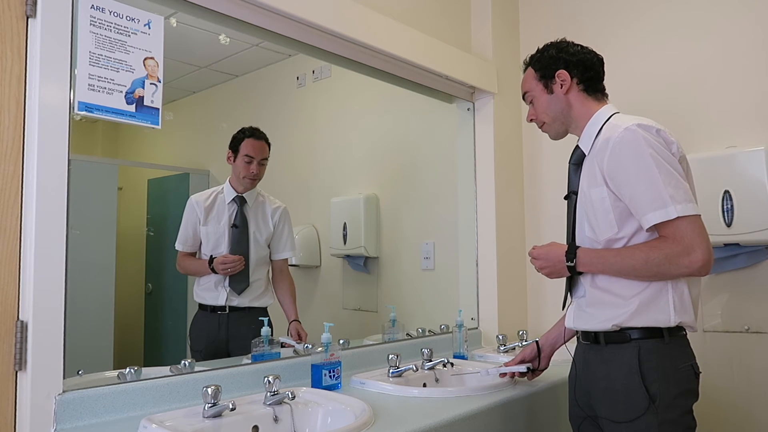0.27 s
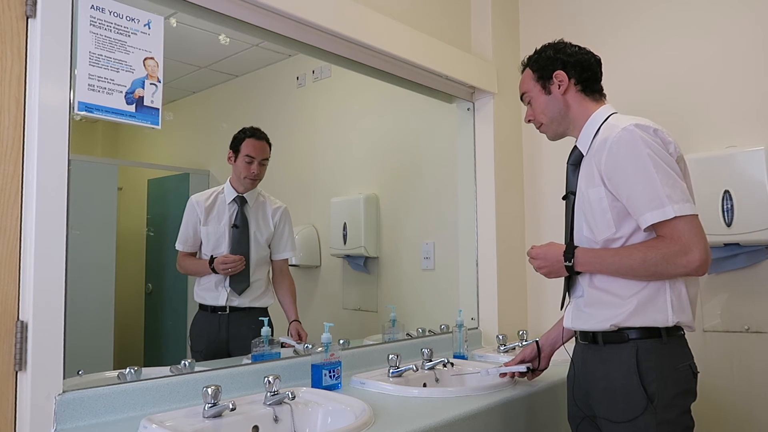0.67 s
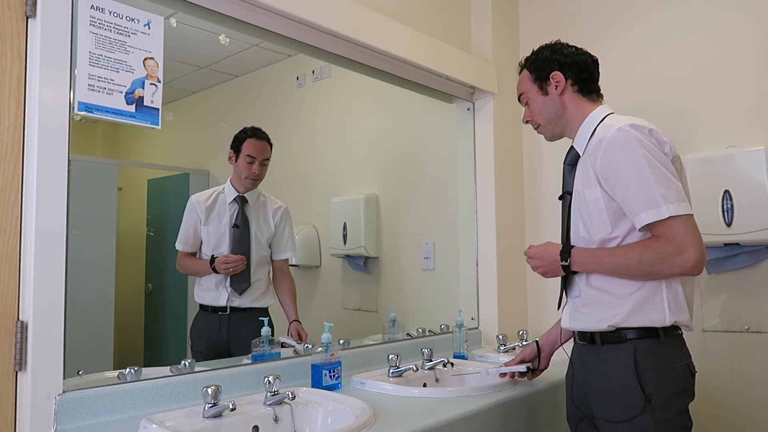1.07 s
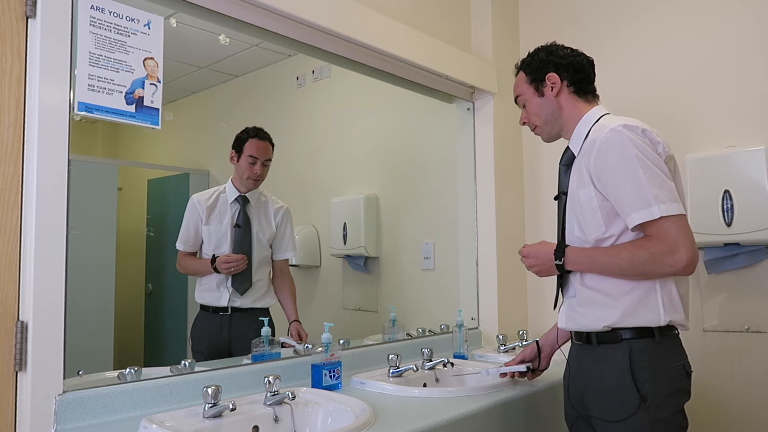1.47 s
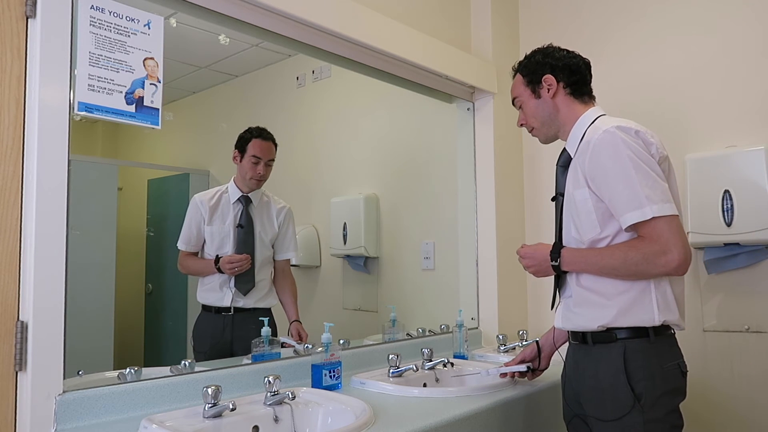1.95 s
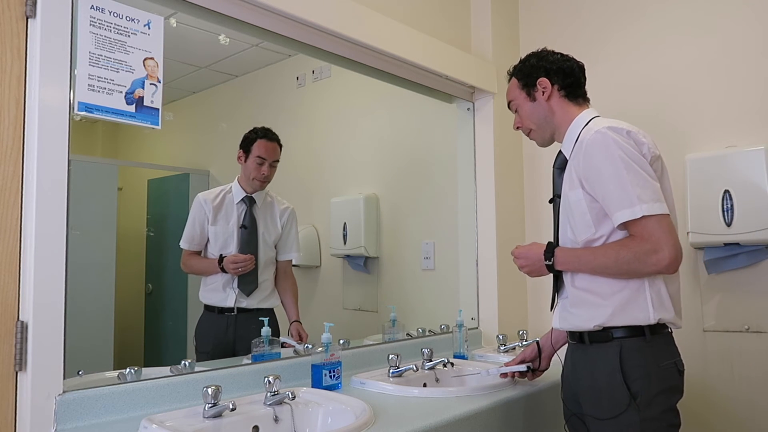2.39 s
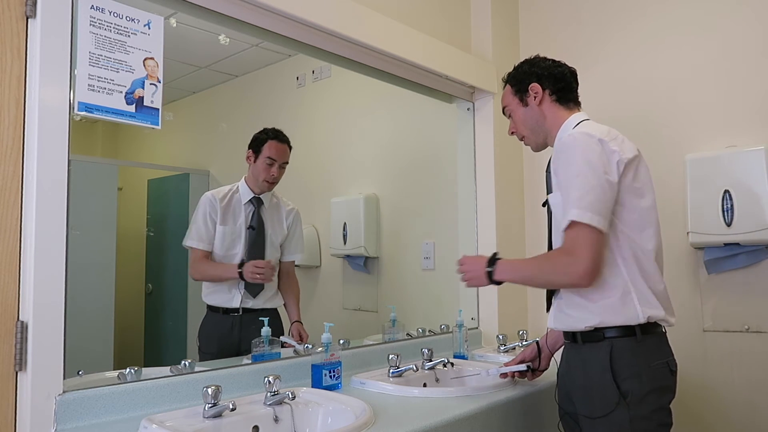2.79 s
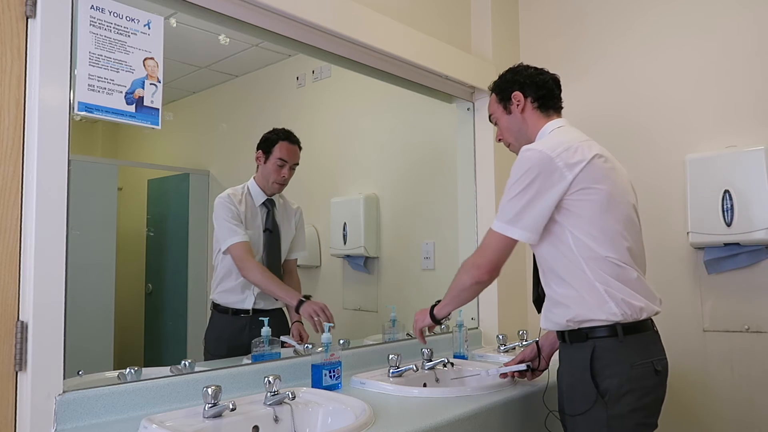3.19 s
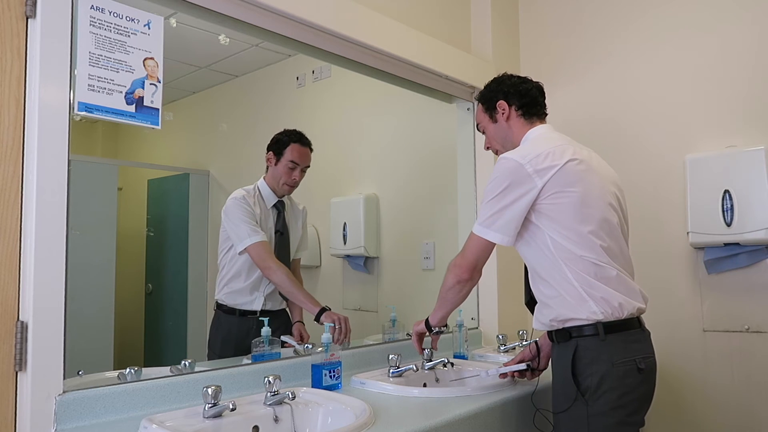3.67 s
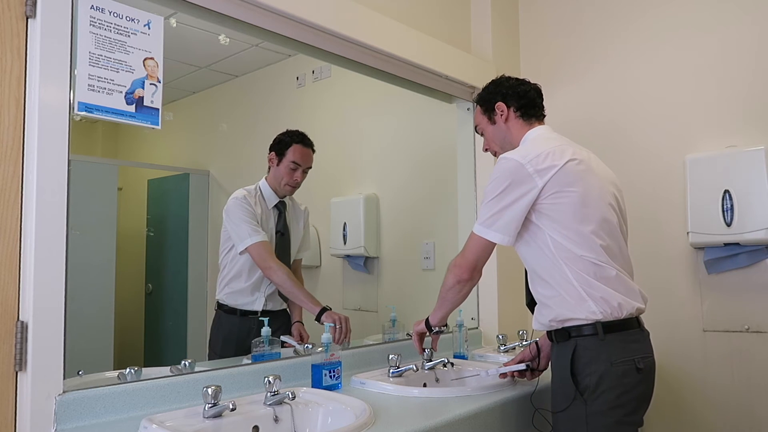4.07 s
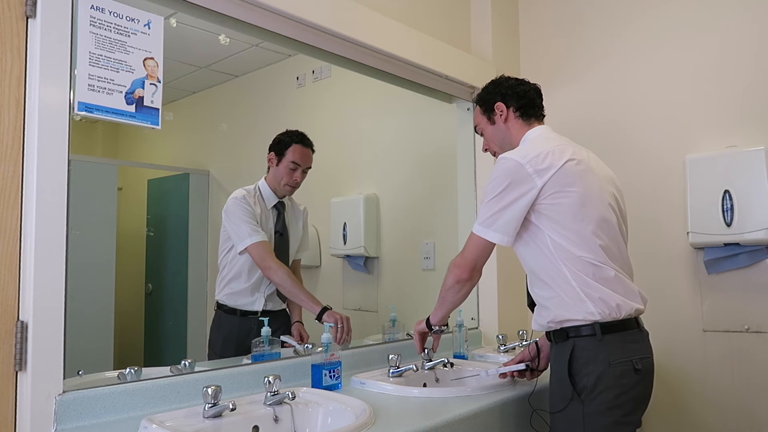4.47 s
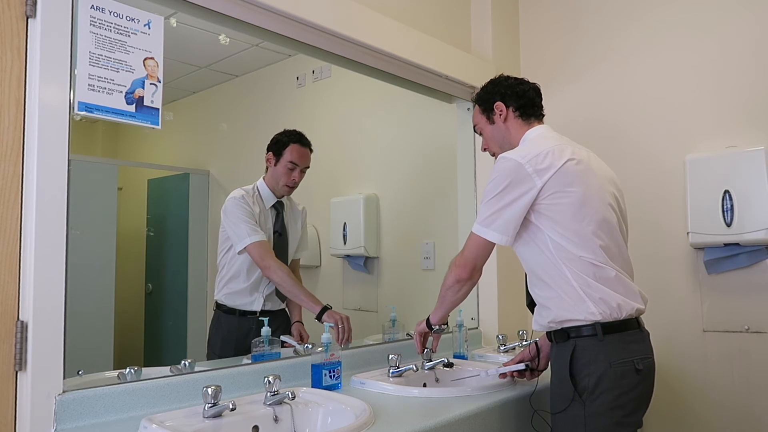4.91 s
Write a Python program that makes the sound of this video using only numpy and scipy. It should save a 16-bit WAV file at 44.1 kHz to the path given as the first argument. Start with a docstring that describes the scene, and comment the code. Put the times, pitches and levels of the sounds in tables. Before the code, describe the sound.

From the start a thin stream of tap water splashes into a washbasin, close to the microphone: a bright, grainy hiss full of tiny high pops, with softer hollow gurgles and plops from the drain. Low pipe rumble, ventilation and faint microphone hiss lie underneath. At about 0.5 s a soft, dull knock, like a panel being bumped, sounds in the room. From 0.8 to 2.3 s the water is at its fullest, uneven and sparkling. It dips near 2.8 s, recovers around 3.2 s, drops again near 3.7 s and surges briefly at 4.1 s. It then falls away quickly, and by about 4.6 s the tap is closed. Single drops remain, one at 4.8 s with a tiny upward blip, then a few faint ticks until just after 5 s, while the low rumble rises slightly. Short tiled-room reflections surround the water. No speech is heard.

```python
"""Tiled washroom: from the start a thin tap stream breaks up in a basin, spray bubbles (damped sines)
popping in the treble, bigger ones plopping in the drain, over noise for pipes, ventilation and microphone hiss.
Half a second in, a dull knock (decaying modes and a puff of noise) sounds somewhere in the room.
The tap closes near the end; the last drops fall singly, one with a swelling upward sweep.
Early echoes and a noise tail place bubbles, drip and knock among the walls."""
import sys
import numpy as np
from scipy import signal
from scipy.fft import rfft, irfft, next_fast_len
from scipy.io import wavfile
from scipy.ndimage import uniform_filter1d, map_coordinates

SR = 44100
rng = np.random.default_rng(int(sys.argv[2]) if len(sys.argv) > 2 else 0)


def bounce(signal):
    """Save signal as a 16-bit WAV file at the path given by the first command-line argument."""
    frames = np.transpose(np.atleast_2d(signal))
    limited = np.clip(frames, -1, 1)
    pcm = np.round(limited * 32767).astype(np.int16)
    wavfile.write(sys.argv[1], SR, pcm)


N = 226672

# Levels of splash, gurgle and low rumble before layer trims; recording gain probably lifts the rumble
# after the tap shuts: [t/s, splash level/dB, gurgle level/dB, low rumble level/dB]
LEVELS = [(0.0, -31, -44, -43), (0.3, -31.5, -44, -42.5), (0.55, -32.5, -44, -40), (0.8, -28.5, -43, -41),
          (1.18, -28.5, -42, -37.5), (1.4, -29.5, -44, -39), (1.65, -29.5, -42, -40),
          (2.25, -30.5, -43, -40.5), (2.83, -35, -45.5, -46), (3.18, -30.5, -42, -40),
          (3.45, -34.5, -47.5, -44.5), (3.74, -38.5, -52.5, -51), (4.11, -30, -44, -44.5),
          (4.27, -36.5, -47.5, -45.5), (4.52, -45.5, -55, -53.5), (4.78, -46, -61, -47.5),
          (4.94, -46.5, -51.5, -43.5), (5.14, -47.5, -47.5, -42)]
# Loudest small bubbles, before the room: [t/s, peak level/dB, f/Hz]
POPS = [(0.037, -9.5, 7280), (0.0562, -17, 8270), (0.0943, -22, 6300), (0.1665, -18.5, 4260),
        (0.185, -13.5, 7200), (0.209, -17, 6700), (0.215, -21.5, 5000), (0.2876, -13.5, 7700),
        (0.2965, -22, 6700), (0.3383, -8, 8900), (0.454, -26, 10470), (0.4846, -19.5, 10200),
        (0.5935, -13, 13900), (0.594, -16, 7700), (0.6473, -8, 6550), (0.699, -18, 5300),
        (0.752, -19, 6950), (0.7725, -20, 8200), (0.784, -21, 4300), (0.7942, -18, 8750),
        (0.812, -14.5, 4740), (0.8124, -13.5, 9500), (0.8335, -16, 7500), (0.9161, -21, 6700),
        (0.949, -15.5, 4700), (0.9799, -12.5, 4700), (1.0026, -13, 9150), (1.0214, -15, 9690),
        (1.0613, -15, 8340), (1.0905, -19, 4100), (1.136, -9.5, 14000), (1.163, -12.5, 10000),
        (1.1962, -11.5, 8600), (1.1985, -18, 5830), (1.2063, -19, 5700), (1.2218, -14, 9300),
        (1.2286, -15, 8640), (1.2768, -14, 8370), (1.28, -11, 8600), (1.2846, -11.5, 6660),
        (1.3071, -8.5, 7860), (1.372, -9, 11540), (1.4262, -20, 4670), (1.4746, -15, 7700),
        (1.5314, -15, 9800), (1.537, -16, 7620), (1.597, -21, 5810), (1.6262, -19.5, 4630),
        (1.638, -8.5, 8900), (1.6457, -18, 6700), (1.696, -18, 7710), (1.7008, -23, 6720),
        (1.744, -18.5, 4870), (1.787, -11, 13100), (1.7875, -12.5, 7160), (1.8334, -16, 6060),
        (1.85, -16, 7440), (1.8614, -24, 6680), (1.89, -11.5, 4440), (1.9303, -26, 9400),
        (1.999, -11, 5470), (2.0608, -8, 5680), (2.0923, -20, 5600), (2.1053, -20, 12190),
        (2.1122, -17, 5100), (2.118, -20, 4180), (2.1335, -19, 4100), (2.1688, -12, 7000),
        (2.2418, -13.5, 5500), (2.2749, -9.5, 7640), (2.3233, -15.5, 8100), (2.367, -20, 5230),
        (2.386, -16, 6900), (2.4016, -18, 14560), (2.4365, -20, 13500), (2.4685, -16, 8570),
        (2.5342, -18, 5470), (2.5475, -8.5, 6400), (2.5538, -12, 6600), (2.573, -15, 5600),
        (2.5777, -12.5, 9100), (2.5885, -14, 10000), (2.592, -17, 6870), (2.6195, -18.5, 12600),
        (2.725, -25, 3700), (2.7451, -23.5, 7540), (2.765, -17, 10100), (2.8208, -22, 7450),
        (2.853, -8, 4210), (2.885, -27, 4870), (2.9866, -27, 11150), (2.9964, -13.5, 6030),
        (3.0547, -19.5, 4320), (3.0612, -16, 5900), (3.0646, -15.5, 7360), (3.128, -16.5, 6100),
        (3.1612, -21, 11240), (3.1671, -23, 4720), (3.183, -20.5, 4320), (3.1932, -16, 7200),
        (3.1962, -15, 5000), (3.2191, -21, 9800), (3.2314, -25, 7000), (3.237, -12.5, 10900),
        (3.285, -20.5, 4730), (3.329, -18, 8550), (3.441, -19, 10100), (3.4599, -19, 12660),
        (3.481, -12, 7940), (3.4996, -16, 5300), (3.544, -19, 5100), (3.5661, -17, 9500),
        (3.5812, -16, 9600), (3.6575, -22, 4680), (3.7153, -27.5, 3840), (3.738, -6.5, 7770),
        (3.7461, -24, 7900), (3.7589, -20, 5000), (3.8575, -23, 5860), (3.87, -17.5, 7460),
        (3.9229, -9, 5420), (3.9495, -18, 7300), (3.9754, -23.5, 5360), (4.0728, -21.5, 5240),
        (4.136, -19.5, 3900), (4.1372, -16, 6330), (4.2452, -15.5, 9800), (4.2664, -25, 5900),
        (4.279, -23, 5600), (4.3015, -18, 9200), (4.3475, -20, 11710), (4.3512, -24, 9100),
        (4.3728, -25, 5640), (4.3818, -22, 5800), (4.406, -18.5, 8850), (4.4188, -22, 9220),
        (4.4458, -17, 9450), (4.5004, -25.5, 6140), (4.512, -27, 10200), (4.519, -7.5, 7880),
        (4.544, -25, 7860), (4.5547, -24, 7500), (4.5806, -22, 7950), (4.6493, -19.5, 7800),
        (4.6551, -22, 10100), (4.663, -37, 4200), (4.702, -22, 12800), (4.75, -33, 5030),
        (4.781, -29, 8000), (4.854, -32, 10300), (4.923, -38, 5300), (4.96, -41, 7000), (4.985, -38, 5040),
        (5.0857, -34, 6600)]
# Larger bubbles in the drain, before the room: [t/s, peak level/dB, f/Hz, climb in pitch as a share of f]
PLOPS = [(0.0917, -28.5, 3030, .2), (.096, -30, 1750, .2), (0.1651, -26, 3260, .3),
         (0.254, -27.5, 2350, .2), (0.298, -29, 2090, .2), (0.6678, -30, 1730, 0.25),
         (0.693, -31.5, 1650, 0.11), (0.713, -36, 1700, 0.18), (0.725, -29, 2980, .2),
         (1.0034, -30.5, 1205, .2), (1.0869, -16.5, 2910, 0.26), (1.105, -27.5, 1220, .1),
         (1.596, -24, 2680, 0.22), (1.703, -31, 2790, 0.18), (1.8442, -29, 2200, 0.22),
         (1.9081, -31, 1900, 0.16), (1.945, -33, 1426, 0.12), (2.459, -26, 1120, 0.26),
         (2.6691, -23.5, 2550, .15), (2.7247, -37, 2700, .2), (2.7751, -34, 3020, 0.18),
         (2.865, -31.5, 2200, .05), (3.0582, -22.5, 3120, .2), (3.0815, -25, 1420, 0.12),
         (3.098, -27, 1555, 0.21), (3.133, -34, 1400, .2), (3.175, -25.5, 2700, .15),
         (3.1822, -23, 2790, .4), (3.228, -24, 2900, 0.22), (3.245, -28, 3200, .1),
         (3.3042, -29, 1860, .05), (3.5263, -38, 2680, .2), (3.5983, -35.5, 2440, 0.17),
         (3.6696, -34.5, 2760, .2), (3.714, -34, 2240, .4), (3.767, -31.5, 1960, 0.22),
         (3.772, -35, 1760, .05), (3.8836, -20.5, 2280, 0.14), (3.952, -30, 1740, .05),
         (4.11, -33.5, 1500, 0.091), (4.133, -32, 1540, .2), (4.148, -30, 2520, .2),
         (4.2157, -32.5, 1890, 0.26), (4.2635, -35.5, 1590, .05), (4.298, -31, 3150, .2),
         (4.337, -29.5, 1120, 0.44), (4.402, -32.5, 2200, 0.044), (4.4647, -35, 2780, .05),
         (4.544, -43, 2200, 0.22), (4.59, -41.5, 2760, .1), (4.7408, -38, 2090, 0.11),
         (4.746, -34, 2900, 0.26), (4.986, -46, 2780, .1), (5.069, -40, 2550, .2)]
# Modes of the knocked panel, relative to KNOCK_DB: [f/Hz, level/dB, t60/s]
KNOCK_MODES = [(503, -10, 0.19), (731, -2, 0.11), (1020, 1.5, 0.087), (1510, -8, 0.17), (1910, 1, 0.058),
               (2240, -3, .05)]
# Spectra in dB; rush() brings its noises to rms 1, SLAP filters the puffs directly.
# Dull body of the panel: [f/Hz, level/dB]
PANEL_BODY = [(250, -30), (450, 2), (1000, -7), (2000, -8), (4000, -42)]
# Hiss of the splash: [f/Hz, level/dB]
SPLASH = [(1470, -41), (2500, -6.5), (3520, 1), (4760, 1), (7530, -2), (14900, -6), (16000, -29)]
# Froth under the gurgle: [f/Hz, level/dB]
FROTH = [(500, -48), (900, -2), (1500, -4), (2200, 3), (3200, -3.5), (6000, -42)]
# Water striking water: [f/Hz, level/dB]
SLAP = [(1200, -60), (3000, -9.5), (6000, 3), (10000, 1.5), (16000, -4)]
# Low rumble of the pipes: [f/Hz, level/dB]
PIPES = [(100, -49), (170, -9.5), (279, 2), (345, -3.5), (382, -3.5), (620, -7), (748, -7.5), (864, -9.5),
         (949, -10.5), (1300, -12.5), (1690, -22.5), (2860, -120)]
# The bowl's hollow note: [f/Hz, level/dB]
BASIN = [(200, -33), (262, -18), (279, 1), (298, 13), (380, -46)]
# The waste pipe's steady note: [f/Hz, level/dB]
DRAIN = [(330, -55), (405, -1.5), (440, 2.5), (475, -0.5), (580, -58)]
# Ventilation: [f/Hz, level/dB]
FAN = [(15, -70), (28, -45), (54, -30), (78, -9.5), (118, 5.5), (170, -4.5), (260, -7), (1500, -20),
       (4000, -20.5), (8000, -45), (16000, -50)]
# Faint steady hiss of the microphone: [f/Hz, level/dB]
MIC_HISS = [(300, -60), (1100, -4), (1550, 3), (2100, -4), (4000, -4), (8000, -10), (16000, -14)]
# Early echoes off the nearest walls: [delay t/s, level/dB]
WALLS = [(.0012, -36), (.0045, -16.5), (.0078, -23.5), (0.014, -32)]
# Decay of the tiled room: [f/Hz, t60/s]
TILES = [(300, 0.41), (2000, 0.38), (6000, 0.27), (14000, 0.41)]

TOP_HZ = 15900
MIC_HISS_DB, DRAIN_DB = -60.5, -53.5
FAN_DB, FAN_SHARE = -40.5, 0.39  # dB before the share of the rumble level; dB per dB of rumble
KNOCK_S, KNOCK_DB = 0.506, -30
DRIP_S = 4.7732
SHUT_S, SHUT_FADE_S, SHUT_DULL_DB = 4.63, 0.25, -13  # the closing tap takes the finest bubbles away
SISTER_DB, SISTER_GROWS = -13.5, 0.68  # for a 0 dB pop; dB per dB of pop: the loudest ring cleanest
SLAP_DB, SLAP_GROWS, SLAP_SCATTER_DB = -15, 0.5, 4  # likewise for the drop's slap, before its spectrum
PLOP_CYCLES = 21.3


def amp(db):
    """Amplitude factor of a level in dB."""
    return 10 ** (np.asarray(db) / 20)


def unit(x):
    """Signal scaled to rms 1."""
    return x / np.sqrt(np.mean(x ** 2) + 1e-20)


def along(points, hz):
    """Value of (f/Hz, value) points, interpolated on a log frequency axis."""
    f, value = np.transpose(points)
    return np.interp(np.log(hz + 1), np.log(f + 1), value)


def curves(rows):
    """One value per sample for each column after the time."""
    s, *columns = np.transpose(rows)
    return [np.interp(np.arange(N) / SR, s, column) for column in columns]


def filtered(x, response):
    """Signal multiplied in the spectrum by a response of frequency."""
    size = next_fast_len(N + SR // 2)
    spectrum = rfft(x, size) * response(np.fft.rfftfreq(size, 1 / SR))
    return irfft(spectrum, size)[:N]


def rush(spectrum, patchy_db):
    """Shaped noise of rms 1, with patches of random gain in time and frequency."""
    z = signal.stft(rng.standard_normal(N), nperseg=256)[2]
    field = uniform_filter1d(rng.standard_normal(z.shape), size=8, axis=0)
    field = uniform_filter1d(field, size=8, axis=1)
    noise = signal.istft(z * amp(patchy_db * unit(field)), nperseg=256)[1][:N]
    return unit(filtered(noise, lambda hz: amp(along(spectrum, hz))))


def lumps(rate, depth_db):
    """Uneven gain: random levels, rate of them a second, joined smoothly."""
    levels = rng.standard_normal(int(N * rate / SR) + 4)
    return amp(depth_db * map_coordinates(levels, [np.arange(N) * rate / SR]))


def microphone_hiss():
    """Faint steady hiss of the microphone, as shaped noise."""
    return amp(MIC_HISS_DB) * rush(MIC_HISS, patchy_db=-0.5)


def rumble():
    """Smooth noise: pipes and basin take the rumble level, ventilation a share of it, the drain note stays."""
    rumble_db = curves(LEVELS)[-1]
    pipes = rush(PIPES, patchy_db=0.75) + amp(-10) * rush(BASIN, patchy_db=1.5)
    ventilation = amp(FAN_DB + FAN_SHARE * rumble_db) * rush(FAN, patchy_db=1.6)
    drain = amp(DRAIN_DB) * rush(DRAIN, patchy_db=2.0)
    return amp(rumble_db) * pipes + ventilation + drain


def washroom(x, tail_db):
    """Direct sound, echoes off the nearest walls, and a noise tail drawn anew every third of a second."""
    out = x.copy()
    for s, db in WALLS:
        delay = round(s * SR)
        out[delay:] += amp(db) * x[:N - delay]
    step = SR // 3
    wet = np.zeros(N + 2 * SR)
    for start in range(0, N, step):
        hz, t, z = signal.stft(rng.standard_normal(SR // 2), SR, nperseg=256)
        decay = amp(-60 * t / along(TILES, hz)[:, None])
        tail = signal.istft(z * decay, SR, nperseg=256)[1]
        part = signal.fftconvolve(x[start:start + step], tail / np.linalg.norm(tail))
        wet[start + 200:][:len(part)] += part  # the tail sets in 200 samples after the direct sound
    return out + amp(tail_db) * wet[:N]


def knock():
    """One soft blow on a panel: each mode rings unevenly over a dull puff."""
    t = np.maximum(np.arange(N) / SR - KNOCK_S, 0)
    ring = np.zeros(N)
    for hz, db, t60 in KNOCK_MODES:
        ring += lumps(69.6, depth_db=5) * amp(db - 60 * t / t60) * np.sin(2 * np.pi * hz * t)
    puff = amp(-3.5 - 60 * t / 0.33) * rush(PANEL_BODY, patchy_db=-0.5)
    soft_onset = 1 - np.exp(-t / 0.013)
    return amp(KNOCK_DB) * soft_onset * (ring + puff)


def late_drip(db, start_hz, close_s):
    """A late drop's cavity closes ever faster: the tone swells, sweeps up and bursts."""
    u = np.clip((np.arange(N) / SR - DRIP_S) / close_s, 0, 1.4)
    hz = start_hz * np.exp(u ** 1.8)
    swell = (1 - np.exp(-u / 0.066)) * amp(db + 11.6 * u - 4.5 * u ** 7) * (u < 1.4)
    return swell * np.sin(2 * np.pi * np.cumsum(hz * (u > 0)) / SR)


def bubbles(s, db, hz, cycles, rise, onset, count):
    """Damped sines of count samples; the pitch climbs as each bubble nears the surface."""
    # cycles: life, over which the level falls 26 dB; rise: share of pitch per life; onset: in cycles
    settings = (s, db, hz, cycles, rise, onset)
    s, db, hz, cycles, rise, onset = (np.broadcast_to(v, np.shape(s))[:, None] for v in settings)
    turns = np.arange(count) / SR * hz
    life = turns / np.maximum(cycles, 1)
    shape = (1 - np.exp(-(turns / onset) ** 2)) * amp(-24.7 * life - 1.3 * life ** 2)
    shape = amp(db) * shape / shape.max(axis=1, keepdims=True)
    ring = shape * np.sin(2 * np.pi * turns * (1 + rise * np.minimum(life, 2) / 2))
    where = np.round(s * SR).astype(int) + np.arange(count)
    return np.bincount(where.ravel(), ring.ravel(), N + SR)[:N]


def slaps(s, db, t60):
    """Drops striking water: short broad puffs of noise with a fast rise and decay."""
    t = np.arange(200) / SR
    rise = 1 - np.exp(-t / 0.0005)
    decay = amp(np.asarray(db)[:, None] - 60 * t / t60)
    puff = decay * rise * rng.standard_normal((len(s), 200))
    where = np.round(s * SR).astype(int)[:, None] + np.arange(200)
    puffs = np.bincount(where.ravel(), puff.ravel(), N + SR)[:N]
    return filtered(puffs, lambda hz: amp(along(SLAP, hz)))


def crowd(count, spread_db):
    """Random moments and levels: many soft, few loud, with a ceiling."""
    when, pick = rng.random((count, 2)).T
    return when * N / SR, -spread_db * np.log(pick + 0.035)


def swarm(count, centre_hz, octaves, spread_db, cycles, size):
    """A crowd of bubbles of scattered pitch and life, brought to rms 1."""
    s, db = crowd(count, spread_db)
    pitch, life = rng.standard_normal((count, 2)).T
    hz = np.clip(centre_hz * 2 ** (octaves * pitch), 600, 15000)
    return unit(bubbles(s, db, hz, cycles * 2 ** (0.56 * life), 0.22, 2.04, count=size))


def fine_spray(bright_db):
    """Crowds of small bubbles and slaps; the closing tap softens the finest most."""
    finest = swarm(count=5000, centre_hz=8780, octaves=0.457, spread_db=4.0, cycles=13.0, size=200)
    coarser = swarm(count=3500, centre_hz=5640, octaves=0.397, spread_db=7.5, cycles=7.1, size=300)
    patter = unit(slaps(*crowd(count=900, spread_db=10.5), t60=0.0047))
    spray = amp(-9.5 + bright_db) * finest
    spray += amp(-12.0 + 0.2 * bright_db) * coarser
    return spray + amp(-13.0 + bright_db) * patter


def single_pops(bright_db):
    """Loudest small bubbles, each with its drop's slap and a sister bubble of scattered pitch."""
    s, db, hz = np.transpose(POPS)
    pops = bubbles(s, db, hz, 10.6, 0.0077, 2.02, count=300)
    thin_db = bright_db[(s * SR).astype(int)]  # the last drops fall singly and splash less
    lag, octaves, splat = rng.standard_normal((len(s), 3)).T
    sister_s = s + 0.00067 * abs(lag)
    sister_db = SISTER_DB + SISTER_GROWS * db + 0.4 * thin_db
    sister_hz = np.minimum(hz * 2 ** (0.404 * octaves), 14000)  # higher or lower than the pop
    pops += bubbles(sister_s, sister_db, sister_hz, 15.6, 0.27, 2.5, count=300)
    slap_db = SLAP_DB + SLAP_GROWS * db + 0.7 * thin_db + SLAP_SCATTER_DB * splat
    return pops + slaps(s, slap_db, t60=0.01)


def drain_plops():
    """Larger bubbles in the drain: lower, longer damped sines that climb in pitch."""
    s, db, hz, climb = np.transpose(PLOPS)
    return bubbles(s, db, hz, PLOP_CYCLES, climb, 0.81, count=1500)


def stream():
    """The water: hiss, fine spray and gurgle follow their levels; single bubbles stand out."""
    splash_db, gurgle_db, _ = curves(LEVELS)
    bright_db = SHUT_DULL_DB * np.clip((np.arange(N) / SR - SHUT_S) / SHUT_FADE_S, 0, 1)
    spray = amp(splash_db) * lumps(60, depth_db=3.0) * fine_spray(bright_db)
    gurgle = swarm(count=1200, centre_hz=1902, octaves=0.514, spread_db=3.0, cycles=12.0, size=1200)
    drops = spray + amp(gurgle_db - 7.5) * gurgle + single_pops(bright_db) + drain_plops()
    hiss_gain = amp(splash_db - 9.5 + 0.26 * bright_db) * lumps(29.4, depth_db=-1.0)
    hiss = hiss_gain * rush(SPLASH, patchy_db=3.5)
    hiss += amp(gurgle_db - 4.5) * rush(FROTH, patchy_db=3.0)
    return drops, hiss


def scene():
    """Drops, drip and knock answered by the room; splash hiss, rumble and microphone hiss added dry."""
    drops, hiss = stream()
    in_room = drops + late_drip(db=-30.0, start_hz=1712, close_s=0.0065) + knock()
    return (washroom(in_room, tail_db=-8) + hiss + rumble() + microphone_hiss())[None]


def record(dry):
    """The microphone channel keeps nothing above its band limit."""
    return filtered(dry[0], lambda hz: hz < TOP_HZ)[None]


dry = scene()
out = record(dry)
bounce(out)
```